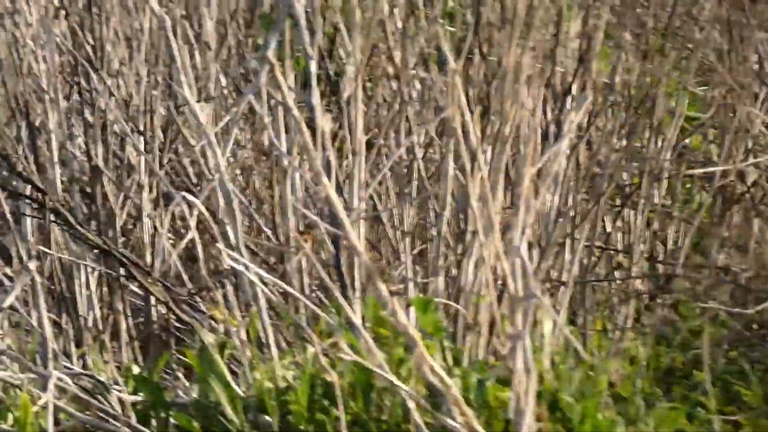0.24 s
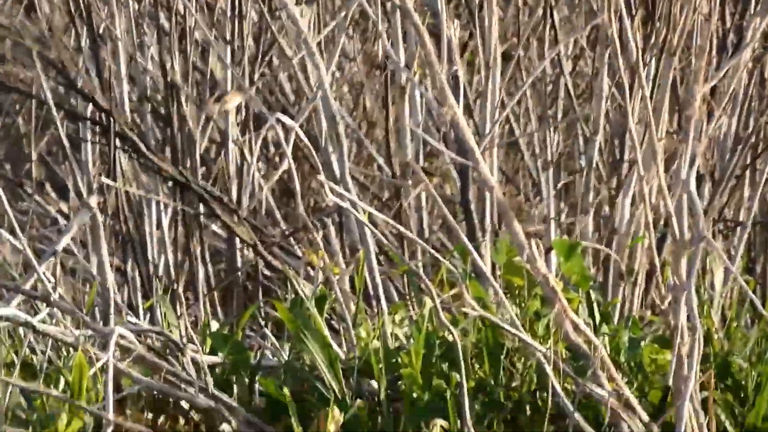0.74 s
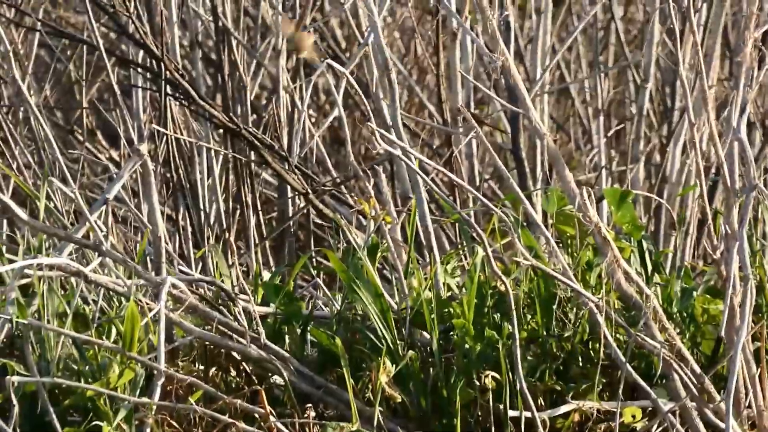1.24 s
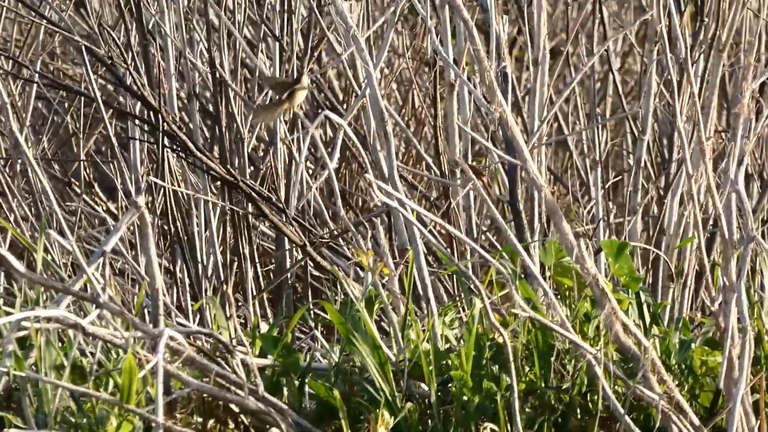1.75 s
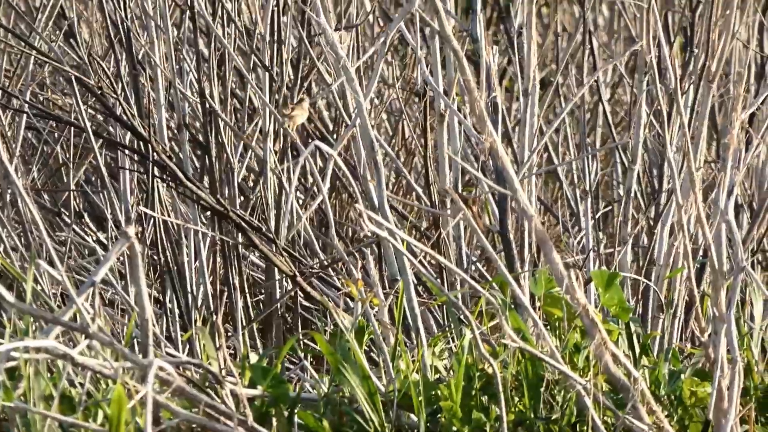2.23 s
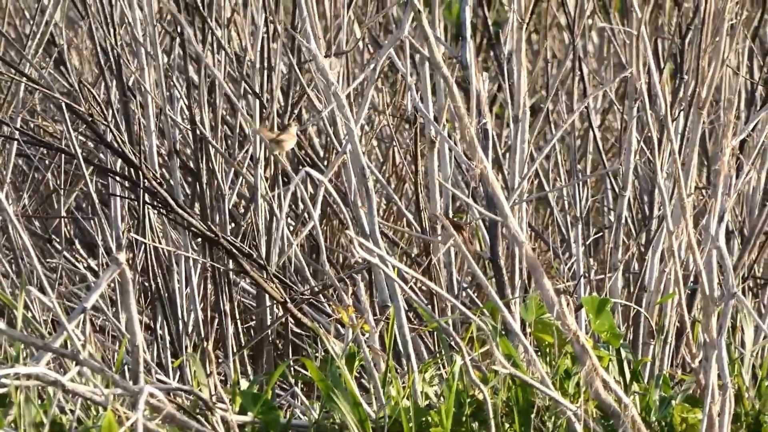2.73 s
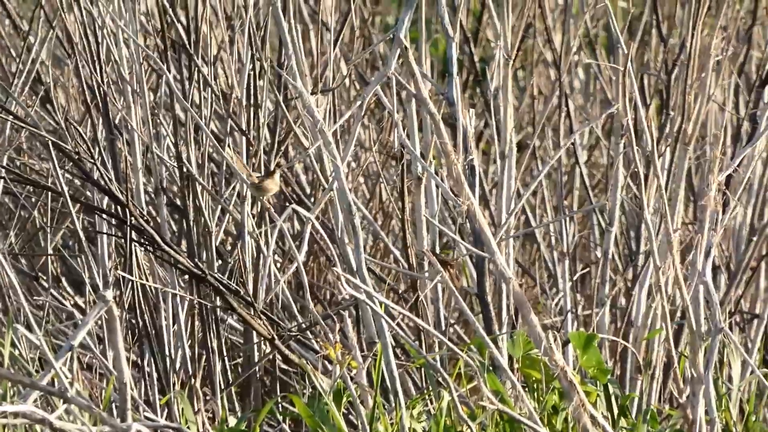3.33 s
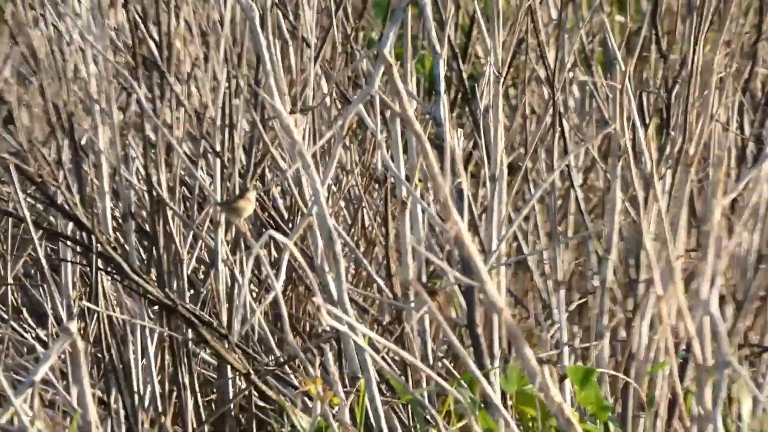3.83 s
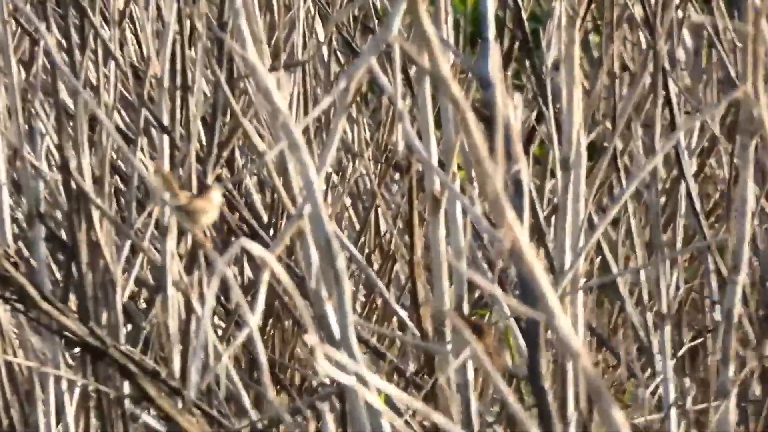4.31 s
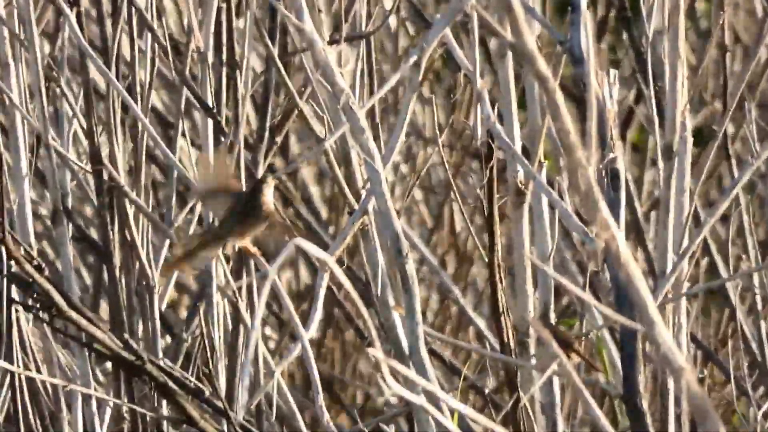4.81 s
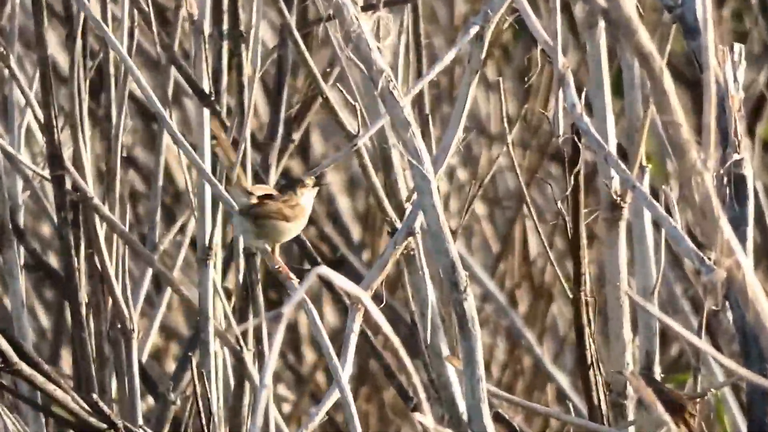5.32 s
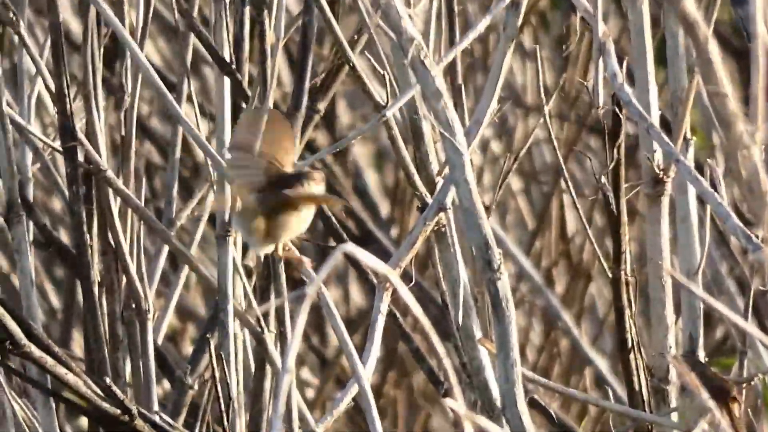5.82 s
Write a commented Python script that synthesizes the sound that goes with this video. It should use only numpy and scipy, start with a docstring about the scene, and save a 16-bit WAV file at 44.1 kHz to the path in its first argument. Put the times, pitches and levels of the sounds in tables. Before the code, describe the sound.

High, buzzy birdsong repeats quickly over short trills, snapping dry stems and the close ticks and whir of a camera lens.

```python
"""Prinias in dry reeds, heard in stereo from the microphone of a hand-held camera.
From the start stems rustle and snap over a faint low drone, and a far bird repeats its phrase.
Right at the microphone the focus motor steps in pips, the lens knocks, the zoom motor whirs and
fingers rub the shell. A second bird trills just before 1 s; from 1.4 s a near one repeats a high
buzzing phrase to the end. The zoom whirs again at 3.8 s, and the trills return at 4.5 s."""
import sys
import numpy as np
from scipy import signal
from scipy.fft import rfft, irfft
from scipy.io import wavfile
from scipy.ndimage import uniform_filter1d

SR = 44100
rng = np.random.default_rng(int(sys.argv[2]) if len(sys.argv) > 2 else 0)


def dump(signal):
    """Clip the signal to [-1, 1] and save it as 16-bit WAV at the path in sys.argv[1]."""
    limited = np.clip(np.atleast_2d(signal).T, -1, 1)
    pcm = np.round(limited * 32767).astype(np.int16)
    wavfile.write(sys.argv[1], SR, pcm)


N = 267246
T = np.arange(N) / SR
HZ = np.fft.rfftfreq(N, 1 / SR)
ZOOMED_IN_S = 4.9

# far drone: (frequency [Hz], level [dB])
DRONE_SPECTRUM = [(20, -26), (50, -1), (100, -4), (150, 8), (200, -3), (330, 1), (580, -2.5), (750, -5),
                  (1000, -8.5), (1600, -12.5), (2100, -22.5), (3400, -12), (5500, -9), (7500, -28)]
# lens hum, right at the microphone: (time [s], level [dB])
HUM_LEVELS = [(0, -64), (.15, -56), (.25, -54.5), (.45, -57.5), (.78, -55.5), (.88, -55), (1.2, -75),
              (2.5, -65), (3.45, -69.5), (3.62, -49.5), (3.8, -50), (3.88, -42), (4.22, -60), (4.7, -60.5),
              (4.94, -45.5), (4.98, -59.5), (6.06, -61.5)]
# its resonances before and after zooming in: (frequency [Hz], width [Hz], level [dB])
WIDE_HUM_MODES = [(1187, 73, 3), (1344, 7.1, -3)]
ZOOMED_HUM_MODES = [(1163, 82, 6.5), (1317, 75, 4)]
# swishes of dry stems: (peak time [s], length [s], level [dB])
STEM_SWISHES = [(1.2, 0.11, -57.5), (1.51, 0.22, -56.5), (1.655, 0.11, -65), (2.197, 0.085, -51.5),
                (2.31, 0.22, -59), (2.58, 0.14, -56.5), (2.92, 0.18, -52), (3.28, 0.2, -57.5),
                (4.83, 0.57, -61), (5.08, 0.14, -55.5), (5.24, 0.15, -61), (5.53, 0.27, -68)]
# snaps of stems: (time [s], level [dB])
STEM_SNAPS = [(.1806, -31), (.6466, -28.5), (1.194, -19), (1.2079, -40), (1.2782, -34), (1.2921, -28.5),
              (1.6379, -35), (1.6432, -34), (1.6633, -32), (1.7568, -27.5), (2.0391, -35), (2.0712, -36),
              (2.1947, -26), (2.212, -28.5), (2.8813, -34), (2.9089, -34), (2.9193, -30), (2.9272, -28),
              (2.9444, -27), (2.9651, -38), (2.9834, -35), (3.4443, -34.5), (4.0345, -31), (4.0368, -21),
              (4.0395, -32), (4.091, -29), (4.667, -32), (4.8322, -32), (4.8381, -30), (4.8861, -37),
              (5.0768, -30), (5.2371, -31.5), (5.5511, -32), (5.5635, -31.5), (5.6388, -38), (6.0204, -36)]
# colours of the rustle and the snaps: (frequency [Hz], level [dB])
RUSTLE_SPECTRUM = [(3000, -9.5), (5500, 9), (7000, -3), (7800, 10), (9000, -7), (10200, -0.5), (12000, -10),
                   (14500, -12), (15600, -40)]
SNAP_SPECTRUM = [(1500, -33), (4000, 0), (6000, 5), (7500, 8), (10000, 6), (13000, 0), (16000, -16)]
# shifts of the hand on the camera: (peak time [s], length [s], thrum [dB], rubbing [dB])
GRIP_SHIFTS = [(0.429, 0.34, -53.5, -58), (0.556, 0.19, -49, -49), (0.704, 0.3, -56, -56),
               (0.88, 0.16, -66, -52.5), (3.57, 0.37, -60, -57.5), (3.907, 0.2, -41, -65),
               (4.07, 0.48, -52, -51.5), (4.342, 0.16, -48.5, -83), (4.434, 0.11, -57, -50),
               (4.541, 0.16, -47.5, -71), (4.662, 0.17, -64, -59.5), (4.79, 0.21, -61.5, -59),
               (4.896, 0.23, -86, -54.5), (5.746, 0.22, -60.5, -89)]
# thrumming body and rubbed shell: (frequency [Hz], width [Hz], level [dB])
BODY_MODES = [(308, 44, 15.5), (390, 250, -0.5)]
SHELL_MODES = [(425, 172, 3.5), (611, 25, 10), (801, 120, -2.5), (1131, 91, 3)]
# far bird: (first falling whistle [s], last [s], phrases [count], first level [dB], last level [dB])
FAR_RUNS = [(0.137, 1.298, 5, -50.5, -45), (1.591, 4.19, 10, -41, -38), (4.475, 5.371, 4, -38.5, -35.5)]
# its notes: (time from that whistle [s], length [s], start [Hz], middle [Hz], end [Hz], level [dB])
FAR_NOTES = [(-.077, .036, 6000, 6370, 6620, -7), (-.039, .008, 5300, 4000, 5000, -9),
             (-.028, .008, 5200, 3850, 5000, -8), (0, .024, 5400, 5170, 4960, 0)]
# moves of the focus motor: (time [s], pip [dB], clack [dB])
FOCUS_MOVES = [(.059, -37.5, -35), (0.19, -38, -61), (0.258, -35.5, -37), (0.324, -40.5, -36),
               (0.358, -40, -40), (0.859, -42, -39), (.883, -37.5, -37), (0.942, -40.5, -41.5),
               (0.977, -36, -37.5), (1.007, -39.5, -41), (1.043, -39, -35.5), (1.144, -42.5, -41),
               (1.175, -37, -36), (1.377, -43, -41.5), (1.445, -36, -34.5), (1.544, -33.5, -36.5),
               (1.646, -44, -44), (1.677, -33.5, -37.5), (1.779, -43, -46), (1.81, -33, -36.5),
               (1.945, -41.5, -41), (2.075, -36.5, -40), (2.103, -41, -41), (2.134, -33.5, -32.5),
               (2.204, -40, -44), (2.270, -33, -35.5), (2.337, -39, -47), (2.369, -28.5, -33),
               (2.402, -38.5, -40.5), (2.470, -32.5, -32), (2.503, -40.5, -40), (2.570, -32.5, -33.5),
               (2.638, -40, -40.5), (2.669, -31, -32.5), (2.805, -40.5, -39), (2.835, -33, -32),
               (2.87, -37.5, -42.5), (2.902, -31.5, -35), (2.936, -41.5, -49), (3.004, -34, -35.5),
               (3.037, -40.5, -43), (3.104, -33, -33.5), (3.137, -40, -43), (3.237, -34, -34.5),
               (3.270, -40, -47), (3.337, -33.5, -38), (3.404, -43.5, -44), (3.438, -34, -36.5),
               (3.477, -39.5, -53), (3.642, -38.5, -36), (3.677, -39, -44), (3.710, -42.5, -46),
               (3.744, -33.5, -46), (3.776, -37, -45), (3.809, -32.5, -50), (3.878, -46, -37),
               (3.979, -36.5, -41), (4.047, -31.5, -35), (5.154, -46, -35.5), (5.189, -44, -38.5),
               (5.286, -45.5, -38.5), (5.365, -44, -37), (5.432, -44, -36.5), (5.464, -47, -37.5),
               (5.498, -43.5, -35), (5.567, -44, -41), (5.663, -43.5, -39.5), (5.697, -47.5, -38.5),
               (5.73, -46.5, -37), (5.834, -46, -41.5), (5.932, -49.5, -36), (5.964, -51, -37)]
# ring of the lens barrel: (frequency [Hz], width [Hz], level [dB])
BARREL_MODES = [(1190, 70, 7), (1252.5, 47, -0.5), (1347, 27, 11), (2373, 18, 6)]
# ring of the focus drive as it starts: (frequency [Hz], level [dB])
DRIVE_MODES = [(590, -12), (1010, -10.5), (1715, -8.5), (1970, -16), (2420, -7), (2760, -9.5), (4400, -7),
               (10200, -17)]
# knocks in the camera: (time [s], clatter [dB], clatter decay [s], thud [dB])
LENS_KNOCKS = [(0.179, -42.5, 0.025, -40), (0.22, -42, 0.0093, -66), (0.2326, -37.5, 0.025, -55),
               (0.2373, -38, 0.0011, -29), (0.253, -66, 0.0052, -33.5), (3.8347, -23, 0.0022, -23),
               (4.034, -40.5, 0.0059, -37)]
# colour of their clatter: (frequency [Hz], level [dB])
CLATTER_SPECTRUM = [(30, -48), (150, -16), (330, 5), (550, 6.5), (800, -2), (1250, 1.5), (1900, -9),
                    (2700, -12.5), (3500, -25), (4600, -19), (6500, -16.5), (9000, -16), (15000, -26)]
# gear whir, one list a zoom run: (time [s], level [dB])
ZOOM_LEVELS = [
    [(.29, -59), (.33, -61), (.47, -54.5), (.6, -57), (.68, -62), (.72, -67), (.755, -52.5), (.785, -107)],
    [(3.833, -42), (3.86, -45), (3.93, -44.5), (4.05, -48), (4.22, -58), (4.4, -57.5), (4.75, -64),
     (4.8, -55), (4.85, -93)],
]
# gear resonances, slow run then fast: (frequency [Hz], width [Hz], level [dB])
GEAR_MODES = [
    [(1230, 90, -2), (1780, 120, -4.5), (2400, 110, -1.5), (2816, 68, 9), (2960, 220, -1), (4570, 53, 2)],
    [(1220, 38, 2.5), (1810, 180, -20.5), (2430, 150, -6), (2875, 86, 4.5), (3107, 180, 0),
     (3660, 620, -15), (4630, 134, 2), (5600, 190, -15)],
]
# gear flutter, one row a run: (mean rate [Hz], depth [0-1])
GEAR_FLUTTER = [(62, 0.32), (128, 0.1)]
# fizz of the sliding barrel: (frequency [Hz], level [dB])
SLIDE_SPECTRUM = [(3000, -6.5), (5500, -47), (7300, -12), (9000, 0.5), (10500, 2.5), (12500, -1.5),
                  (14300, -13), (15600, -3)]
# trills: (first full note [s], last [s], notes [count], first level [dB], last level [dB])
TRILL_RUNS = [(0.858, 1.012, 9, -36.5, -37.5), (1.243, 1.45, 11, -38, -34), (4.522, 4.669, 8, -37.5, -36),
              (4.97, 5.16, 10, -31, -30)]
# near bird's phrases: (accent time [s], buzz [dB], chips [dB], closing whistle [dB])
NEAR_PHRASES = [(1.4944, -23.5, -28, -26.5), (1.8598, -23.5, -27, -26.5), (2.226, -22, -27, -28.5),
                (2.5932, -22, -27, -28), (2.957, -22.5, -31.5, -29.5), (3.3228, -23, -27.5, -28.5),
                (3.6876, -21.5, -26.5, -27.5), (4.0503, -22, -38, -29), (4.415, -20.5, -30, -25.5),
                (4.7812, -21, -35, -28), (5.1462, -19.5, -25, -24), (5.5123, -20.5, -26.5, -24),
                (5.8761, -18, -24.5, -24)]
# its notes: (time from accent [s], length [s], start [Hz], middle [Hz], end [Hz], relative level [dB])
ACCENT_NOTES = [(-.01, .016, 6700, 6950, 7050, -24), (0, .004, 4900, 6500, 7300, -3.5),
                (.0054, .004, 7300, 6300, 5000, -7)]
CHIP_NOTES = [(.0212, .006, 3900, 5250, 5600, -6), (.0275, .006, 6200, 4800, 3700, -13),
              (.0385, .009, 6400, 4000, 6000, -15), (.049, .009, 6400, 3700, 6000, -13),
              (.0595, .009, 6200, 3900, 6000, -10)]
CLOSING_NOTES = [(.081, 0.038, 5450, 5265, 4950, 0)]
# echo of the reed bed: (frequency [Hz], time to fall 60 dB [s])
REED_DECAY = [(2500, 0.56), (4000, 0.081), (5500, 0.19), (8000, 0.12)]
# noise at the two microphone ports: (frequency [Hz], left-right likeness [0-1])
PORT_LIKENESS = [(30, 0.97), (120, 0.95), (300, 0.98), (600, 0.82), (1200, 0.95), (5000, 0.97),
                 (9000, 0.79), (14000, 0.36)]
# overall tone colour, with a deep dip near 7.7 kHz: (frequency [Hz], gain [dB])
TONE_COLOUR = [(20, -5), (45, -10.5), (100, -3), (2950, 5), (3350, -4), (3800, -2), (6700, -3),
               (7700, -18.5), (8800, 1)]


def amp(db):
    """Decibels to gain."""
    return 10 ** (np.asarray(db) / 20)


def evened(x):
    """Scales to rms 1."""
    return x / np.sqrt(np.mean(x ** 2) + 1e-20)


def read(points, hz):
    """Reads a spectrum on a log-frequency axis."""
    f, value = np.transpose(points)
    return np.interp(np.log(hz + 1), np.log(f + 1), value)


def add(mix, s, sound):
    """Mixes a sound in at time s."""
    part = mix[..., max(round(s * SR), 0):][..., :sound.shape[-1]]
    part += sound[..., :part.shape[-1]]


def wander(size, hz):
    """A random drift that takes a new value hz times a second."""
    knots = rng.standard_normal(size // 8 + 2)
    return np.interp(np.arange(size) * hz / SR, np.arange(len(knots)), knots)


def peaks(modes):
    """Gain over frequency of a set of steep resonances."""
    return sum(amp(db) / (1 + (2 * (HZ - hz) / width) ** 2) for hz, width, db in modes)


def noise(gain):
    """Coloured noise, nearly alike at the two microphone ports below the high treble."""
    mid, side = rfft(rng.standard_normal((2, N)))
    same = read(PORT_LIKENESS, HZ)
    mid, side = mid * np.sqrt(1 + same), side * np.sqrt(1 - same)
    return evened(irfft(np.array([mid + side, mid - side]) * gain, N))


def driven_noise(modes, steadiness=.81):
    """Resonant noise with its chance swells evened out, as in a driven mechanism."""
    x = noise(peaks(modes))
    power = uniform_filter1d((x ** 2).mean(0), size=700)
    return evened(x / (abs(power) + 1e-9) ** (steadiness / 2))


def swells(rows):
    """Smooth rises and falls from rows of (peak time [s], length [s], level [dB])."""
    return sum(amp(db) * np.cos(np.pi * np.clip((T - s) / length, -.5, .5)) ** 2
               for s, length, db in rows)


def far_drone(level_db=-60, patchy_db=6):
    """A faint distant drone whose bands swell independently."""
    spectrum = rfft(noise(amp(read(DRONE_SPECTRUM, HZ))))
    centres = np.geomspace(60, 3000, num=10)
    bands = [irfft(spectrum * np.interp(HZ, centres, band), N) * amp(patchy_db * wander(N, 18))
             for band in np.eye(len(centres))]
    return amp(level_db) * evened(sum(bands))


def lens_hum(gain_db=-1, picture_hz=30):
    """The lens hums at the microphone, pulsing once a picture; its colour changes once zoomed in."""
    level = amp(np.interp(T, *np.transpose(HUM_LEVELS)) + gain_db)
    pulsing = evened(1 + .55 * np.cos(2 * np.pi * picture_hz * (T - .01)))
    hum = np.where(T < ZOOMED_IN_S, driven_noise(WIDE_HUM_MODES), driven_noise(ZOOMED_HUM_MODES))
    return level * pulsing * hum


def stems(snap_db=2, rest_db=-62, swish_db=3, grain_db=4, faint_db=-52):
    """Dry stems, slightly to the right: a grainy rustle that swells with each swish, and snaps."""
    grain = evened(amp(grain_db * wander(N, 1500)))
    level = amp(rest_db) + amp(swish_db) * swells(STEM_SWISHES)
    rustle = level * grain * noise(amp(read(RUSTLE_SPECTRUM, HZ)))
    faint = [(when * T[-1], faint_db + 8 * strength) for when, strength in rng.random(size=(20, 2))]
    return (rustle + amp(snap_db) * snaps(STEM_SNAPS + faint)) * amp([[-1], [1]])


def snaps(rows, tail_db=-19, tail_s=.0011):
    """Each snap of a stem is one sharp click with a brief splintering tail, a little to one side."""
    out, t = np.zeros((2, N)), np.arange(600) / SR
    for s, db in rows:
        splinters = rng.standard_normal(len(t)) + .5 * rng.standard_normal((2, len(t)))
        snap = amp(tail_db) * np.exp(-t / tail_s) * splinters
        snap[:, 0] = 1  # the click
        pan_db = rng.standard_normal() * np.array([[1], [-1]])
        add(out, s, amp(db + pan_db) * snap)
    colour = amp(read(SNAP_SPECTRUM, HZ))
    return irfft(rfft(out) * colour / irfft(colour, N)[0], N)


def handling(slip_db=9, hold_db=-66):
    """Fingers slip on the camera: its body thrums and its shell rubs, faintly even when held still."""
    thrum = swells((s, length, db) for s, length, db, _ in GRIP_SHIFTS)
    rub = amp(hold_db) + swells((s, length, db) for s, length, _, db in GRIP_SHIFTS)
    slips = evened(amp(slip_db * np.tanh(wander(N, 90))))
    return thrum * driven_noise(BODY_MODES) + rub * slips * noise(peaks(SHELL_MODES))


def paced(first, last, repeats, first_db, last_db):
    """Times and levels of an even run whose level changes steadily."""
    return np.linspace((first, first_db), (last, last_db), round(repeats))


def whistle(hz, envelope, octave_db=-42):
    """The syrinx: a near sine with a slight waver, a fine tremor and a faint octave."""
    wavering_hz = hz * (1 + .008 * wander(len(hz), 900))
    phase = 2 * np.pi * np.cumsum(wavering_hz) / SR + .9 * rng.standard_normal()
    tremor = amp(.8 * wander(len(hz), 800))
    return envelope * tremor * (np.sin(phase) + amp(octave_db) * np.sin(2 * phase))


def notes(table, s, level_db, vary_db=1, late=1, point=0):
    """Whistles arcing through three pitches; late above 1 delays the crest, point sharpens it."""
    for offset, length, start, middle, end, db in table:
        u = np.linspace(-1, 1, max(round(length * SR), 16))
        hz = middle + (end - start) / 2 * u + ((start + end) / 2 - middle) * u ** 2
        gain = amp(level_db + db + vary_db * rng.standard_normal())
        turn = np.pi * ((u + 1) / 2) ** late
        swell = np.sin(turn) ** 2 * np.exp(-point * abs(np.cos(turn)))
        detune = 1 + .005 * rng.standard_normal()
        yield s + offset - length / 2, whistle(hz * detune, gain * swell)


def thicket(song, wet_db, onset_s=.0025):
    """Stems scatter the song into a short dense tail that shifts as the birds move."""
    echo = np.zeros((2, N))
    for k in range(4):  # four tails take turns, leaning left and right
        taps = rng.standard_normal(SR // 4) * (rng.random(SR // 4) < .1)
        hz, t, spectra = signal.stft(taps, SR, nperseg=256)
        decay = amp(-60 * t / read(REED_DECAY, hz)[:, None])
        tail = signal.istft(spectra * decay, SR, nperseg=256)[1]
        tail *= np.clip(np.arange(len(tail)) / SR / onset_s - .5, 0, 1)
        share = np.maximum(np.cos(2 * np.pi * (T / 2 - k / 4)), 0)
        wet = signal.oaconvolve(song * share, tail / np.linalg.norm(tail))[:N]
        echo += wet * (1 + .039 * (-1) ** k * np.array([[1], [-1]]))
    return song + amp(wet_db) * echo


def far_bird():
    """Far off in the reeds: a rising whistle, two chips and a falling whistle, at an even pace."""
    song = np.zeros(N)
    for run in FAR_RUNS:
        for s, db in paced(*run):
            for note in notes(FAR_NOTES, s, db):
                add(song, *note)
    return thicket(song, wet_db=-2)


def drive_clack(t, decay_s=.0021):
    """The focus drive rings its modes as it starts, a little differently each time."""
    ring = np.zeros(len(t))
    for hz, db in DRIVE_MODES:
        gain = amp(db + 1.5 * rng.standard_normal())
        detune = 1 + .008 * rng.standard_normal()
        ring += gain * np.sin(2 * np.pi * (hz * detune * t + rng.random()))
    return (t / decay_s) ** 2 * np.exp(-t / decay_s) * ring


def focus_motor(step_hz=1225, zoomed_hz=(1040, 1370), short_s=.0105, long_s=.0167):
    """The drive clacks and rasps as motor steps ring the barrel; zoomed in, moves lengthen and rise."""
    octave_db, drive_db, zoomed_db = -17, -6, 2
    lead_s, rasp_crest_s, rasp_width_hz = .0054, .0028, 260
    t = np.arange(2000) / SR
    barrel = sum(amp(db) * width * np.exp(-np.pi * width * t) * np.sin(2 * np.pi * hz * t)
                 for hz, width, db in BARREL_MODES)
    pips, rasp = np.zeros((2, N))
    for s, pip_db, clack_db in FOCUS_MOVES:
        zoomed, start = s > ZOOMED_IN_S, s - lead_s
        progress = np.minimum(t / (long_s if zoomed else short_s), 1)
        hz = np.interp(progress, [0, 1], zoomed_hz if zoomed else (step_hz, step_hz))
        phase = 2 * np.pi * np.cumsum(hz) * (1 + .012 * rng.standard_normal()) / SR
        swell = abs(np.sin(np.pi * progress ** .78)) ** (.5 if zoomed else 1)
        steps = swell * (np.sin(phase) + amp(octave_db) * np.sin(2 * phase))
        pip = signal.fftconvolve(steps, barrel)[:len(t)]
        add(pips, start, amp(pip_db + zoomed * zoomed_db) * pip / abs(pip).max())
        drive = amp(clack_db + drive_db)
        add(pips, start, drive * drive_clack(t))
        add(rasp, start, drive * t / rasp_crest_s * np.exp(-t / rasp_crest_s))
    return pips + rasp * driven_noise((hz, rasp_width_hz, db) for hz, db in DRIVE_MODES)


def knocks(thud_hz=410, crest_s=.002, rise_s=.001):
    """Parts of the lens take up their slack: a short clatter and a dead thud of the camera body."""
    t = np.arange(SR // 8) / SR
    thud = (t / crest_s * np.exp(1 - t / crest_s)) ** 2 * np.sin(2 * np.pi * thud_hz * t)
    clatter, thuds = np.zeros((2, N))
    for s, clatter_db, decay_s, thud_db in LENS_KNOCKS:
        add(clatter, s, amp(clatter_db) * np.minimum(t / rise_s, 1) * np.exp(-t / decay_s))
        add(thuds, s, amp(thud_db) * thud)
    return clatter * noise(amp(read(CLATTER_SPECTRUM, HZ))) + thuds


def zoom_motor(whir_db=4, fizz_db=-50, fizz_follow=.71, surge_db=1.5):
    """Close gears whir, fluttering and surging with the turning shaft; the sliding barrel fizzes."""
    levels = [amp(np.interp(T, *np.transpose(run), left=-200, right=-200)) for run in ZOOM_LEVELS]
    whir = np.zeros((2, N))
    for level, gears, (flutter_hz, depth) in zip(levels, GEAR_MODES, GEAR_FLUTTER):
        turns = np.cumsum(flutter_hz * (1 + .15 * wander(N, 30))) / SR
        throb = evened((1 + depth * np.sin(2 * np.pi * turns)) * amp(surge_db * wander(N, 45)))
        whir += amp(whir_db) * level * throb * driven_noise(gears, steadiness=.66)
    slide = (sum(levels) / np.max(levels)) ** fizz_follow
    return whir + amp(fizz_db) * slide * noise(amp(read(SLIDE_SPECTRUM, HZ)))


def trilling_bird(rasp_db=-4.5, lead_db=-12, start_flat=.062, settle_s=.29):
    """Fast arches of pitch between steep sweeps that the reeds smear into a rasp."""
    arches, rasp = np.zeros((2, N))
    # sweeps and arch have the columns of FAR_NOTES
    sweeps = [(-.006, .004, 6400, 4700, 3300, 0), (.006, .004, 3300, 4500, 6200, 0),
              (.0105, .004, 4200, 5300, 6400, -2)]
    for row in TRILL_RUNS:
        run = paced(*row)
        start = 2 * run[0, 0] - run[1, 0]  # a soft, slightly flat note leads in
        for s, db in [(start, run[0, 1] + lead_db), *run]:
            pitch = 1 - start_flat * np.exp((start - s) / settle_s)
            arch = (0, .0095, 3150 * pitch, 4370 * pitch, 3150 * pitch, 0)
            s += .0007 * rng.standard_normal()
            add(arches, *next(notes([arch], s, db, vary_db=2)))
            for when, sweep in notes(sweeps, s, db + rasp_db, vary_db=2):
                add(rasp, when + .0008 * rng.standard_normal(), sweep)
    return thicket(arches, wet_db=-6.5) + thicket(rasp, wet_db=.5) - rasp / 2


def buzz(s, level_db, fade_db=3.5, squareness=3):
    """Eight pulses grow and clear out of a rasp, each dropping from a flick onto the same pitch."""
    lead_s, period_s, pulse_s, last_pulse_s = .0308, .01325, .0115, .0132
    rest_hz, flick_hz, flick_step_hz, settle_s = 5488, 1850, 130, .00115
    hook_hz, hook_s = 3000, .0005
    fade = fade_db + .3 * rng.standard_normal()
    for k in range(8):  # counted back from the last pulse
        last = k == 0
        t = np.arange(round((last_pulse_s if last else pulse_s) * SR)) / SR
        flick = (flick_hz - flick_step_hz * k) * np.exp(-t / settle_s)
        hook = last * hook_hz * np.exp(-t / hook_s)  # the last pulse swoops up into its flick
        hz = rest_hz + flick - hook + 22 * k * wander(len(t), 2000)
        db = level_db + last - fade * k + .8 * rng.standard_normal()
        early_s = .0002 * rng.standard_normal()
        swell = np.tanh(squareness * np.sin(np.pi * t / t[-1]) ** 2)
        yield s - lead_s - k * period_s - early_s, whistle(hz, amp(db) * swell)


def near_bird():
    """Nearby: buzz, sharp accent, loose falling chips, closing whistle; quick sweeps scatter most."""
    tones, accents, chips = np.zeros((3, N))
    for s, buzz_db, chips_db, close_db in NEAR_PHRASES:
        for note in [*buzz(s, buzz_db), *notes(CLOSING_NOTES, s, close_db, late=1.55, point=.22)]:
            add(tones, *note)
        for note in notes(ACCENT_NOTES, s, buzz_db):
            add(accents, *note)
        for when, chip in notes(CHIP_NOTES, s, chips_db, vary_db=2.5):
            add(chips, when + .0008 * rng.standard_normal(), chip)
    return thicket(tones, wet_db=-11.5) + thicket(accents, wet_db=-6) + thicket(chips, wet_db=-2)


def scene():
    """The camera right at the microphone, the birds out in the reeds and the drone beyond."""
    camera = focus_motor() + zoom_motor() + handling() + knocks()
    birds = near_bird() + far_bird() + trilling_bird()
    return camera + birds + stems() + far_drone() + lens_hum()


def record(dry, edge_hz=15900):
    """Overall tone colour, with a deep dip near 7.7 kHz, and the recorder's band limit."""
    coloured = irfft(rfft(dry) * amp(read(TONE_COLOUR, HZ)), N)
    lowpass = signal.firwin(511, edge_hz, window=("kaiser", 9), fs=SR)
    return signal.oaconvolve(coloured, lowpass[None], "same")


dry = scene()
out = record(dry)
dump(out)
```